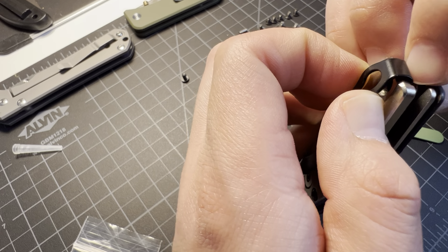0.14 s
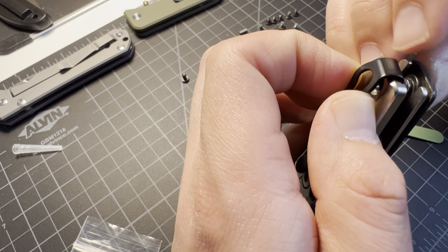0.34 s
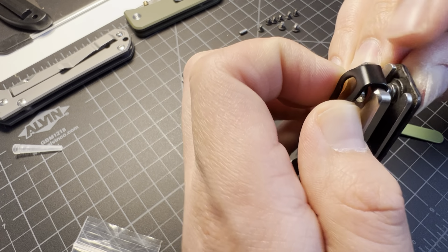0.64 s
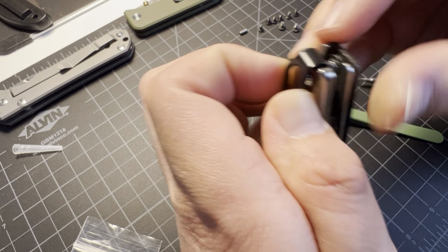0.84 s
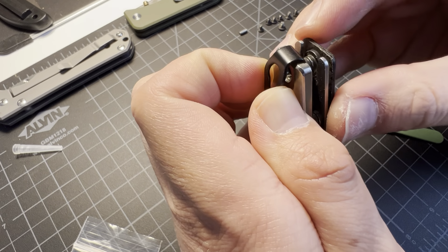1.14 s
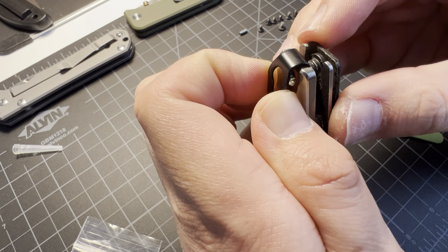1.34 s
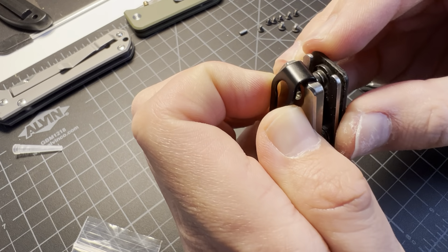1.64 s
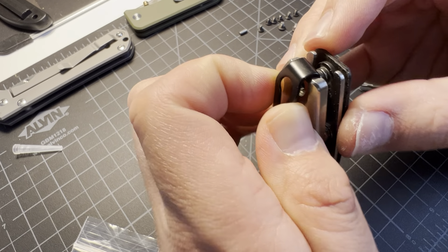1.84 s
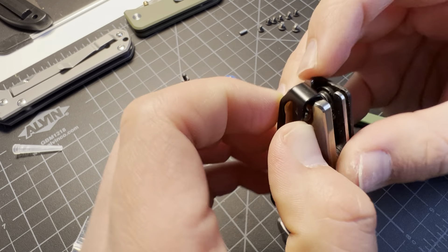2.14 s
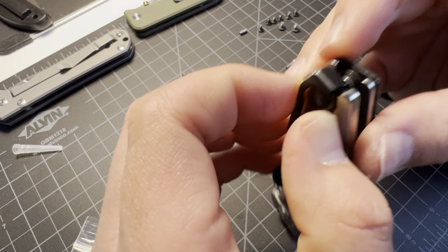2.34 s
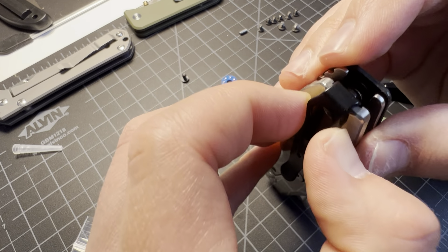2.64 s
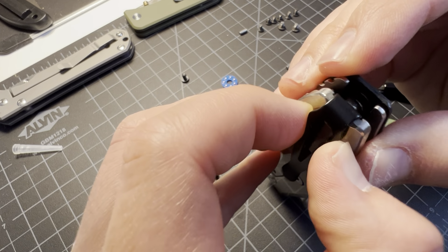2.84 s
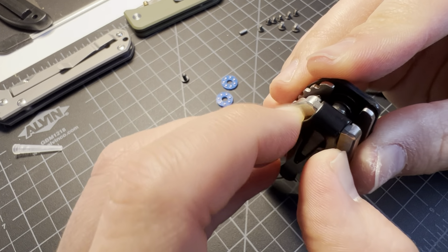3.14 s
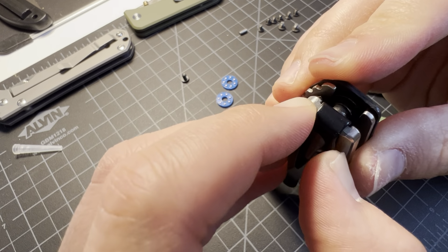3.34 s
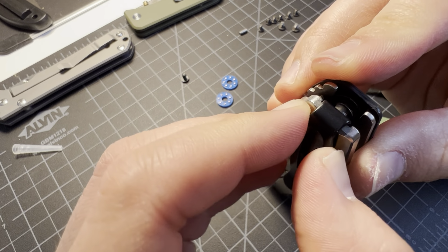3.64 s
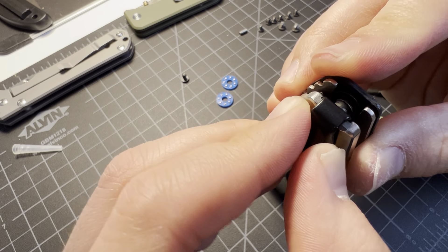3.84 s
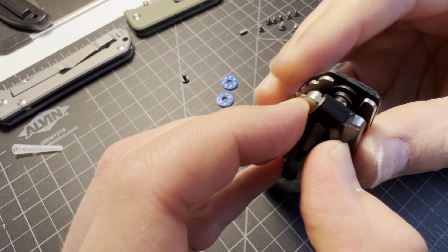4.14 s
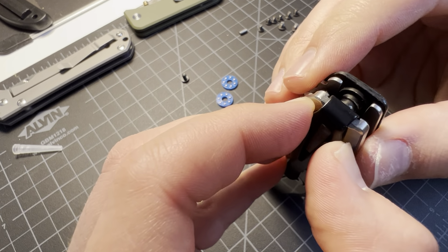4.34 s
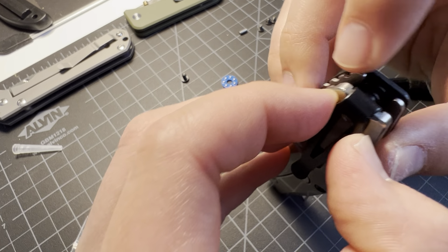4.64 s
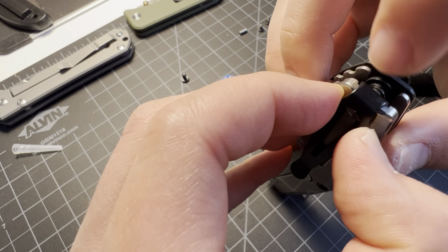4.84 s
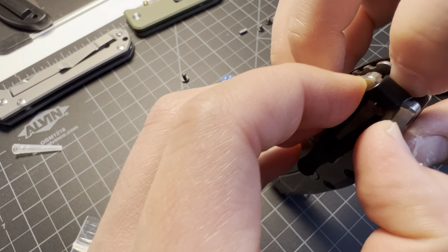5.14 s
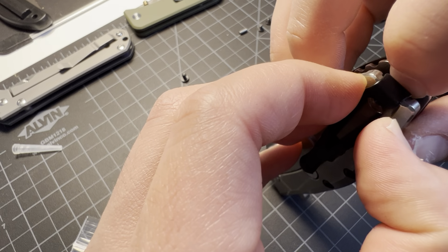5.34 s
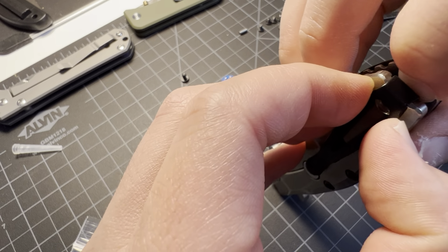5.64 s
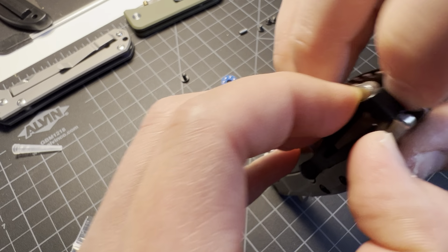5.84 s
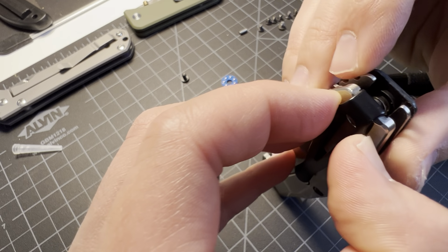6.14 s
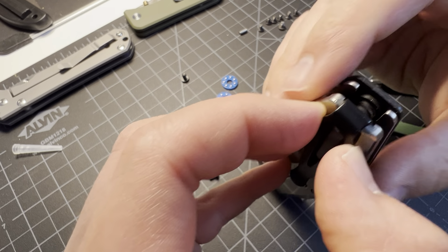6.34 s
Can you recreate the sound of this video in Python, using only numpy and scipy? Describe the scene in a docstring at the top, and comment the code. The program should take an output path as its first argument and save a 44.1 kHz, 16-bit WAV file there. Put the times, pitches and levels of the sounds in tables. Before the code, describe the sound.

Close, quiet handling of a loose folding knife over a matted bench in a small room. Soft skin rubs and tiny steel ticks come first, then a low juddering scrape along the mat ending in a firm knock with a slight rattle. Sparse clicks and thin metal slides follow, with a sharper bright snap near the end. Faint low rumble and hiss sit beneath, in close stereo.

```python
"""A half-assembled folding knife is worked between the fingers over a cutting mat in a small room.
Steel parts rub, tick and ring: bursts and grains of noise through spectra and decaying modes.
The handle is dragged over the mat by stick-slip and set down once with a knock: a falling chirp
plus bench modes. Skin swishes and squeaks faintly. Band-wise echoes, low rumble and hiss are added."""
import sys
import numpy as np
from scipy import signal
from scipy.fft import rfft, irfft, next_fast_len
from scipy.io import wavfile
from scipy.ndimage import uniform_filter1d

SR = 44100
rng = np.random.default_rng(int(sys.argv[2]) if len(sys.argv) > 2 else 0)


def log_audio(samples):
    """Write samples as a 16-bit WAV file to the path given in sys.argv[1]."""
    # one column per channel
    frames = np.atleast_2d(samples).T
    # limit to full scale, then quantise
    limited = np.clip(frames, -1, 1)
    pcm = np.round(limited * 32767).astype(np.int16)
    wavfile.write(sys.argv[1], SR, pcm)


N = 286650
TIME = np.arange(N) / SR

# Levels are relative: trims, shaping and ringing follow in the functions.
# room rumble spectrum: [hz, density_db_per_hz]
RUMBLE_COLOUR = [(15, -38), (25, -28.5), (62, 3.5), (108, -2.5), (135, -2), (204, -22), (274, -18.5),
                 (305, -27), (408, -30), (518, -47.5), (600, -58.5), (780, -71), (1320, -120)]
# rumble level over time: [time_s, level_db]
RUMBLE_LEVEL = [(0.0, -65), (0.89, -58), (1.539, -60.5), (2.132, -53), (3.26, -62), (4.34, -59),
                (4.829, -64.5), (5.559, -67), (5.96, -60.5), (6.5, -60.5)]
# hiss spectrum: [hz, density_db_per_hz]
HISS_COLOUR = [(350, -31), (600, -4), (790, -4.5), (931, -9.5), (1010, -4.5), (1130, -8), (1550, -5.5),
               (3830, -9), (4160, -13), (6460, -11), (10500, -15.5), (12000, -25.5), (16000, -24.5)]
# skin rubbing on handle and mat: [start_s, end_s, swish_db, bench_pressure_db]
RUBS = [(0.64, 0.868, -71, -63.5), (0.879, 0.95, -82, -66), (0.976, 1.06, -84.5, -85),
        (1.2, 1.244, -85.5, -70), (1.48, 1.607, -92, -79.5), (1.888, 2.043, -86.5, -70.5),
        (1.983, 2.086, -73.5, -55.5), (4.393, 4.475, -100, -67), (4.671, 4.885, -85.5, -78.5),
        (5.088, 5.415, -82, -84), (6.065, 6.266, -83.5, -66), (6.275, 6.383, -84.5, -63),
        (6.373, 6.546, -81, -63.5)]
# skin swishing over the handle: [hz, density_db_per_hz]
SKIN_COLOUR = [(300, -18), (620, -2.5), (980, -10.5), (1250, -4), (1700, -6), (2200, -7), (3000, -21),
               (4500, -20)]
# finger pressure heard through the bench: [hz, density_db_per_hz]
PRESS_COLOUR = [(100, -4), (200, -4.5), (330, -5), (420, -11), (520, -32), (900, -23), (2000, -48)]
# metal parts sliding on each other: [start_s, end_s, level_db, focus_hz, focus_db, crest_place_0_to_1]
SLIDES = [(0.83, 0.904, -71.5, 9800, 15.5, 0.14), (0.884, 0.945, -75.5, 6600, -2, 0.1),
          (1.097, 1.132, -80.5, 6500, 3, 0.1), (1.87, 2.09, -75.5, 3480, 13, 0.23),
          (1.887, 2.073, -80, 7300, 0, 0.8), (2.322, 2.37, -79, 5640, 5, 0),
          (2.484, 2.507, -75.5, 5000, 14, 0.35), (2.991, 3.068, -81.5, 5250, 12, 0.2),
          (3.202, 3.274, -78, 6560, -2, 0.1), (4.005, 4.068, -78, 6730, 14, 0.58),
          (4.54, 4.595, -87, 7000, 10.5, 0.04), (4.11, 4.136, -71, 10200, 20, 0.6),
          (4.145, 4.209, -74, 10400, 11, 0.25), (4.726, 4.79, -80.5, 5010, 4, 0.64),
          (4.985, 5.05, -81, 7800, 0, 0.25), (5.192, 5.335, -73.5, 9220, 9.5, 0.15),
          (5.888, 5.945, -71.5, 7300, 7, 0.13), (5.937, 5.964, -70, 7440, 8, 0.7),
          (6.284, 6.376, -68, 8920, 12.5, 0.24), (6.301, 6.375, -73.5, 5300, 19.5, 0.45),
          (6.381, 6.496, -80, 5330, 14, 0.44), (6.402, 6.56, -78, 10000, 5, 0.5),
          (6.468, 6.54, -74, 5560, 15, 0.2)]
# steel sliding on steel: [hz, density_db_per_hz]
SLIDE_COLOUR = [(1500, -9.5), (2600, -1), (3600, -7.5), (4400, -1.5), (5300, 0), (6100, 0.5), (7200, 4),
                (8500, -2.5), (9700, -3), (10800, -6), (12000, -17.5), (15500, -17.5)]
# modes of steel liners and scales: [hz, level_db, t60_s]
KNIFE_MODES = [(3490, -4, .15), (4800, -3.5, 0.18), (5620, -4, 0.13), (5800, -2.5, 0.0983),
               (6900, -9, 0.089), (7810, 4, 0.11), (7780, 2, 0.11), (8184, -2.5, .14), (10100, -3, .11),
               (9800, -5, .11)]
# handle bumping the bench: [start_s, peak_db, deep_weight_db, softness_hz]
BUMPS = [(0.888, -52.5, -7, 380), (2.042, -33, -16, 590), (2.077, -30.5, -6, 406), (2.1066, -19, -15, 430),
         (2.1615, -22, -11, 415), (2.182, -32.5, 2, 400), (2.248, -28, -2, 396), (2.311, -39, 16, 655),
         (2.5124, -12.5, 0, 2440), (2.5274, -26, 15, 500), (3.325, -64.5, -4, 643), (3.886, -59.5, 2, 606),
         (4.114, -50, -1, 416), (4.155, -46.5, 0, 434), (4.394, -44, -2.5, 380), (4.987, -49, -0.5, 474),
         (5.899, -48, -28, 790), (6.074, -53, 1, 560)]
# height of a bending wave as each pitch arrives: [hz, height_db]
BENDING_WAVE = [(50, -72.5), (72, -17.5), (98, -3), (130, -2), (190, -5.5), (330, 1), (480, 4), (720, -6),
                (1200, -22), (3000, -26.5)]
# modes of the bench top under the mat: [hz, level_db, t60_s]
BENCH_MODES = [(86.4, -6, 0.054), (128.24, 3.5, 0.17), (225.4, -9.5, 0.49), (291, 0, 0.24),
               (325.7, -1.5, 0.22), (357, -3, 0.23), (395.2, 1.5, 0.2), (411.1, -5, 0.2), (507, -11, 0.21),
               (606, -24.5, 0.11), (683.5, -13, 0.2), (815, -25.5, 0.21), (1090, -26.5, 0.22)]
# parts clicking together: [start_s, tick_db, focus_hz, focus_db, handle_jolt_db]
CLICKS = [(1.102, -66, 6500, -2, -73), (1.929, -59, 3000, 19, -82), (2.023, -62, 3000, 15, -52),
          (2.3323, -59, 5830, 8, -63), (2.36, -63, 5270, 15, -75), (2.388, -70, 5100, 13, -76),
          (2.6278, -64, 6850, 10, -69), (2.6544, -64, 6900, 5, -67.5), (2.919, -78, 4030, 3.5, -61),
          (3.2022, -65, 6830, 3, -46.5), (3.2127, -55.5, 6760, 9, -61), (3.234, -46, 6300, 9, -51),
          (3.68, -70.5, 7000, 5.5, -64.5), (3.9215, -59.5, 4350, 28, -59.5), (4.03, -71, 6850, 11.5, -64),
          (4.115, -60, 6880, 17, -83), (4.154, -51.5, 6630, 4, -64), (4.5464, -45, 7060, 12.5, -46.5),
          (4.6737, -65.5, 3025, 17, -58), (4.949, -71.5, 3070, 9, -65), (5.1173, -61.5, 3020, 8.5, -63.5),
          (5.2124, -57, 4960, 12, -62), (5.2804, -63.5, 9200, 4.5, -53.5), (5.877, -51, 8500, 15, -68),
          (5.89, -62, 7000, 11, -66.5), (5.9, -49, 5550, 20, -58.5), (5.9068, -51.5, 5550, 8, -58.5),
          (5.9123, -42, 8000, 10, -52.5), (5.9596, -30.5, 8600, 10.5, -44), (5.989, -51, 8250, 10, -52),
          (6.0737, -67, 5110, -6, -68), (6.217, -65, 3450, 9, -60)]
# tick of a steel edge: [hz, density_db_per_hz]
CLICK_COLOUR = [(1500, -32), (2100, 3), (3000, -3), (3600, 8), (4250, 1), (4800, 8.5), (5600, 7.5),
                (6600, 4), (7800, 7), (8700, 2.5), (10100, 9), (11300, -7), (12200, -2), (13500, -13),
                (15500, -4.5)]
# clack of the composite scale: [hz, density_db_per_hz]
CLACK_COLOUR = [(400, -7), (800, -1.5), (1300, -2), (2100, 2.5), (3000, -11.5), (5000, -18)]
# pushes of the handle over the mat: [start_s, length_s, judder_db, scuff_db, grit_db]
PUSHES = [(2.044, 0.16, -34.5, -46, -57), (2.208, 0.052, -37, -52.5, -62), (2.302, 0.049, -48.5, -65, -87)]
# judder of the dragged handle: [hz, density_db_per_hz]
JUDDER_COLOUR = [(47, -43), (80, -2), (129, 6), (160, -4), (217, 7.5), (300, 4), (400, -1), (460, -5.5),
                 (540, -21.5), (700, -29.5)]
# scuffing body of the handle: [hz, density_db_per_hz]
SCUFF_COLOUR = [(520, -8.5), (670, 8), (800, 2), (900, -6), (1030, 0), (1440, -16), (1650, -14), (2100, -8),
                (2280, -22.5), (2550, -21.5), (2900, -30)]
# grit under the handle: [hz, density_db_per_hz]
GRIT_COLOUR = [(1470, -44), (2500, -10), (3200, -6.5), (4620, -2), (5800, -0.5), (6700, 9), (7600, -0.5),
               (9150, 1.5), (10900, 0.5), (12200, -23), (14700, -16), (16000, -18)]
# loose stack jarred as it catches, is set down and settles: [start_s, steel_db, handle_db, decay_s]
RATTLE = [(2.132, -66, -42, 0.0056), (2.14, -68, -42, 0.0052), (2.222, -74, -51.5, 0.0031),
          (2.5117, -45, -29, 0.005), (2.519, -58, -48.5, 0.022), (2.527, -52.5, -47, 0.0027),
          (2.548, -78, -60.5, 0.033), (2.664, -92, -70, 0.012)]
# hollow clatter of the handle: [hz, density_db_per_hz]
CLATTER_COLOUR = [(520, -8), (660, 7), (830, 4), (1050, -4), (1400, -12), (2050, -4), (2450, -13.5),
                  (2920, -20), (3300, -18.5), (5000, -28.5)]
# modes of the hollow handle: [hz, level_db, t60_s]
HANDLE_MODES = [(1835, -13, .09), (2048, -12, 0.1), (2844, -4, .07), (2977, 0, .08)]
# small steel part tapping its seat: [start_s, level_db]
PIN_TAPS = [(3.68, -50.5), (3.6941, -45), (3.744, -68)]
# click of the small steel part: [hz, density_db_per_hz]
PIN_COLOUR = [(700, -28), (1300, -11), (2600, -30), (3050, -10.5), (3400, -1), (4500, -6), (5200, -10.5),
              (5750, 5), (6330, -7), (6900, 9), (7700, -8), (8400, -12), (9700, -22), (12000, -31)]
# modes of the small steel part: [hz, level_db, t60_s]
PIN_MODES = [(4140, -11, 0.08), (5880, 0, 0.09), (6855, 4, 0.074), (7150, -13, 0.06)]
# fingertips squeaking on the scale: [start_s, end_s, level_db, first_hz, last_hz]
SQUEAKS = [(4.398, 4.461, -53.5, 331, 247.6), (6.292, 6.365, -79, 970, 910), (6.404, 6.5, -67.5, 550, 515)]
# room by band: [centre_hz, echo_db, t60_s, left_right_likeness]
ROOM = [(106, -23.5, 0.36, 0.94), (199.2, -12.5, 0.14, 1), (340, -8.5, 0.35, 0.32), (701, -2, 0.27, -0.431),
        (1230, -5.5, 0.26, -0.49), (2284, -6, 0.23, 0.97), (4630, -9, 0.21, .1), (9020, -11.5, 0.19, 0.39)]
# right channel tone, fuller near 1.2-1.7 kHz, slightly thinner near 2.3 kHz: [hz, gain_db]
RIGHT_COLOUR = [(1, 0), (600, 0), (1200, 3), (1700, 2.5), (2300, -1.5), (4000, 0), (22000, 0)]

UNSTEADY_PER_S = 83   # rate of finger-pressure changes
LIGHT_RUB_HZ, LIGHT_PRESS_DB, PRESS_DB_PER_OCTAVE = 1620, -73, 7.5
JUDDER_POWER, SCUFF_POWER, GRIT_POWER = 0.31, 0.96, 0.94   # growth with sliding speed
CUTOFF_HZ = 15900


def from_db(db):
    """Decibels to gain."""
    return 10 ** (np.asarray(db) / 20)


def rms_one(x):
    """Scale to unit rms."""
    return x / np.sqrt(np.mean(x ** 2) + 1e-20)


def add(track, start_s, sound):
    """Mix a sound into a track at a time."""
    at = int(round(start_s * SR))
    track[at:at + len(sound)] += sound[:max(N - at, 0)]


def waver(size, per_s):
    """Smooth random wandering within +-2."""
    points = np.clip(rng.standard_normal(400), -2, 2)
    return np.interp(np.arange(size) * per_s / SR, np.arange(400), points)


def coloured(x, points, focus_hz=None, focus_db=0, focus_octaves=0.53, ripple_db=0, spacing_hz=170):
    """Minimum-phase filter: a spectrum, a hump at focus_hz and close-set random resonances."""
    size = 2 * next_fast_len(len(x) // 2 + 2048)
    bins_hz = np.maximum(np.fft.rfftfreq(size, 1 / SR), 1)
    octave = np.log2(bins_hz)
    hz, db = np.transpose(points)
    below = np.maximum(np.log2(hz[0]) - octave, 0)
    above = np.maximum(octave - np.log2(hz[-1]), 0)
    curve_db = np.interp(octave, np.log2(hz), db) - 24 * (below + above)   # 24 dB/octave outside
    if focus_hz:
        distance = (octave - np.log2(focus_hz)) / focus_octaves
        curve_db = curve_db + focus_db * np.exp(-distance ** 2)
    resonances = np.clip(rng.standard_normal(400), -2, 2)
    curve_db = curve_db + ripple_db * np.interp(bins_hz / spacing_hz, np.arange(400), resonances)
    # fold the cepstrum so that nothing sounds early
    cepstrum = irfft(np.log(from_db(curve_db)))
    cepstrum[1:size // 2] *= 2
    cepstrum[size // 2 + 1:] = 0
    response = np.exp(rfft(cepstrum))
    return irfft(rfft(x, size) * response)[:len(x)]


def grains(size, per_s, spread_db):
    """Random tiny contacts of uneven strength and either sign."""
    strength = from_db(spread_db * np.minimum(rng.exponential(1, size), 4))
    return (rng.random(size) < per_s / SR) * strength * rng.choice([-1, 1], size)


def stroke(start_s, end_s, per_s, spread_db, crest, uneven_db):
    """Friction grains of one finger movement: rise to a crest, ease off, unsteady pressure."""
    size = int((end_s - start_s) * SR)
    arc = np.interp(np.linspace(0, 1, size), [0, np.clip(crest, .05, .95), 1], [0, 1, 0])
    pressure = from_db(uneven_db * waver(size, UNSTEADY_PER_S))
    return arc * pressure * grains(size, per_s, spread_db)


def chatter(decay_s, colour, focus_hz=None, focus_db=0, seat_s=0.0029):
    """Hard contact: micro-impacts build as the faces seat and die in milliseconds."""
    t = TIME[:SR // 12]
    shape = np.exp(-(t / decay_s) ** 2.2) * (1 - np.exp(-t / seat_s))
    noise = rng.standard_normal(len(t)) * shape
    burst = coloured(noise, colour, focus_hz, focus_db, ripple_db=2.5, spacing_hz=140)
    return rms_one(burst) * np.sqrt(np.mean(shape ** 2))


def ringing(force, modes, ring_db):
    """The contact itself plus hand-damped resonators of the struck part."""
    out = force.copy()
    for hz, db, t60_s in modes:
        r, w = from_db(-60 / (t60_s * SR)), 2 * np.pi * hz / SR
        top, bottom = [1, -r * np.cos(w)], [1, -2 * r * np.cos(w), r * r]
        out += from_db(db + ring_db) * signal.lfilter(top, bottom, force + 1e-18)
    return out


def evened(x):
    """Level held steady over 1300 samples (about 29 ms), finer grain kept."""
    return x / np.sqrt(np.abs(uniform_filter1d(x ** 2, size=1300)) + 1e-9)


def air(spectrum, side_db):
    """Steady stereo noise from independent mid and side, set by colour and width."""
    mid, side = [rms_one(coloured(rng.standard_normal(N + SR), spectrum)[SR:]) for _ in range(2)]
    return mid + from_db(side_db) * side * np.array([[1], [-1]])


def background(rumble_trim_db=3, waver_db=1.93, hiss_db=-85):
    """Slowly swelling, wavering low room rumble and a faint steady hiss."""
    time_s, level_db = np.transpose(RUMBLE_LEVEL)
    swell_db = rumble_trim_db + np.interp(TIME, time_s, level_db) + waver_db * waver(N, 16)
    rumble = from_db(swell_db) * air(RUMBLE_COLOUR, side_db=-14.5)
    return rumble + from_db(hiss_db) * air(HISS_COLOUR, side_db=0)


def rubs(press_trim_db=-2):
    """Skin ridges swish, lower when pressed flatter; pressure murmurs through the bench."""
    out = np.zeros(N)
    for start_s, end_s, swish_db, bench_db in RUBS:
        focus_hz = LIGHT_RUB_HZ * 2 ** ((LIGHT_PRESS_DB - bench_db) / PRESS_DB_PER_OCTAVE)
        ridges = stroke(start_s, end_s, per_s=1600, spread_db=1.5, crest=0.2, uneven_db=-0.5)
        swish = coloured(ridges, SKIN_COLOUR, focus_hz, focus_db=10.0, focus_octaves=0.91,
                         ripple_db=4.5, spacing_hz=68.8)
        murmur = coloured(ridges, PRESS_COLOUR)
        add(out, start_s, from_db(swish_db) * rms_one(swish))
        add(out, start_s, from_db(bench_db + press_trim_db) * rms_one(murmur))
    return out


def slides():
    """Fine machining marks catch one another and excite the liners."""
    out = np.zeros(N)
    for start_s, end_s, db, focus_hz, focus_db, crest in SLIDES:
        marks = stroke(start_s, end_s, per_s=6500, spread_db=2.5, crest=crest, uneven_db=2.9)
        rasp = coloured(marks, SLIDE_COLOUR, focus_hz, focus_db, focus_octaves=0.24,
                        ripple_db=2, spacing_hz=90)
        add(out, start_s, from_db(db) * rms_one(rasp))
    return ringing(out, KNIFE_MODES, ring_db=-70)


def thud(peak_db, weight_db, soft_hz, lag_cycles=1.318, top_hz=3000, deep_hz=200, ring_db=-16):
    """A bending wave crosses the bench, highs first and lows last; its modes ring on."""
    t = TIME[:SR // 5]
    arriving_hz = lag_cycles / (t + lag_cycles / top_hz)
    wave_hz, wave_db = np.transpose(BENDING_WAVE)
    height_db = np.interp(np.log(arriving_hz), np.log(wave_hz), wave_db)
    height_db = height_db + weight_db / (1 + (arriving_hz / deep_hz) ** 4)
    blow = from_db(height_db) * np.sin(2 * np.pi * np.cumsum(arriving_hz) / SR)
    for hz, mode_db, t60_s in BENCH_MODES:
        age_s = np.maximum(t - lag_cycles / hz, 0)
        gain = from_db(ring_db + mode_db + weight_db / (1 + (hz / deep_hz) ** 4))
        envelope = (1 - np.exp(-age_s * hz)) * from_db(-60 * age_s / t60_s)
        blow = blow + gain * np.sin(2 * np.pi * hz * age_s) * envelope
    blow = signal.sosfilt(signal.butter(6, soft_hz, fs=SR, output="sos"), blow)   # contact softness
    blow = signal.sosfilt(signal.butter(2, 50, "high", fs=SR, output="sos"), blow)
    return from_db(peak_db) * blow / np.abs(blow).max()


def bumps():
    """The handle meets the bench through the mat."""
    out = np.zeros(N)
    for start_s, peak_db, weight_db, soft_hz in BUMPS:
        add(out, start_s, thud(peak_db, weight_db, soft_hz))
    return out


def buzz(focus_hz, focus_db, decay_s=0.0056, per_s=1200):
    """After a tick the loose liners tremble against each other in ever smaller contacts."""
    t = TIME[:SR // 8]
    contacts = coloured(grains(len(t), per_s, spread_db=3), CLICK_COLOUR, focus_hz, focus_db / 2)
    return rms_one(contacts) * np.exp(-t / decay_s)


def clicks(tick_trim_db=2, buzz_trim_db=-23, clack_trim_db=-2, thud_trim_db=0.5):
    """Steel edges tick and buzz; the jolt makes the composite scale clack and the bench thud."""
    out, bench = np.zeros(N), np.zeros(N)
    for start_s, db, focus_hz, focus_db, jolt_db in CLICKS:
        tick = chatter(0.0029, CLICK_COLOUR, focus_hz, focus_db)
        clack = chatter(0.0027, CLACK_COLOUR)
        add(out, start_s, from_db(db + tick_trim_db) * tick)
        add(out, start_s, from_db(db + buzz_trim_db) * buzz(focus_hz, focus_db))
        add(out, start_s, from_db(jolt_db + clack_trim_db) * clack)
        add(bench, start_s, thud(jolt_db + thud_trim_db, weight_db=-6, soft_hz=433))
    return ringing(out, KNIFE_MODES, ring_db=-56) + bench


def drag(slips_per_s=420, spit_depth=0.84, spit_decay_s=0.00088, catch_db=6):
    """Stick-slip pushes: each slip shakes the bench, crunches in the handle and spits grit."""
    out, bench, t = np.zeros(N), np.zeros(N), TIME[:SR // 2]
    for start_s, length_s, judder_db, scuff_db, grit_db in PUSHES:
        speed = np.sin(np.pi * np.minimum(t / length_s, 1)).clip(0)
        slips = np.zeros(len(t))
        slip_s = np.cumsum(rng.gamma(4, 1 / (4 * slips_per_s), 600))
        slip_index = np.minimum(slip_s * SR, len(t) - 1).astype(int)
        slips[slip_index] = from_db(rng.normal(0, 2.5, len(slip_s)))
        catches = slips * from_db(catch_db * waver(len(t), 300))
        judder = evened(coloured(slips - slips.mean(), JUDDER_COLOUR))
        scuff = evened(coloured(catches * rng.choice([-1, 1], len(t)), SCUFF_COLOUR))
        spits = signal.lfilter([1], [1, -np.exp(-1 / (spit_decay_s * SR))], catches + 1e-18)
        grit_noise = rng.standard_normal(len(t)) * (1 + spit_depth * spits)
        grit = evened(coloured(grit_noise, GRIT_COLOUR))
        add(bench, start_s, from_db(judder_db) * judder * speed ** JUDDER_POWER)
        add(out, start_s, from_db(scuff_db) * scuff * speed ** SCUFF_POWER)
        add(out, start_s, from_db(grit_db) * grit * speed ** GRIT_POWER)
    return out + ringing(bench, BENCH_MODES, ring_db=-62.5)


def rattle():
    """Each jar shakes the unscrewed stack: steel jingles over the hollow clatter of the handle."""
    steel, hollow = np.zeros(N), np.zeros(N)
    for start_s, steel_db, handle_db, decay_s in RATTLE:
        jingle = chatter(decay_s, SLIDE_COLOUR, 4100, focus_db=7.0, seat_s=0.00098)
        clatter = chatter(decay_s, CLATTER_COLOUR, seat_s=0.0002)
        add(steel, start_s, from_db(steel_db) * jingle)
        add(hollow, start_s, from_db(handle_db) * clatter)
    return ringing(steel, KNIFE_MODES, ring_db=-55.5) + ringing(hollow, HANDLE_MODES, ring_db=-50)


def pin_taps(decay_s=0.0024, rustle_db=-22, rustle_s=0.012):
    """A small steel part clicks against its seat and shivers there with a fine rustle."""
    out, t = np.zeros(N), TIME[:SR // 12]
    for start_s, db in PIN_TAPS:
        shivers = coloured(grains(len(t), 2500, spread_db=2), PIN_COLOUR)
        rustle = rms_one(shivers) * np.exp(-t / rustle_s)
        tap = chatter(decay_s, PIN_COLOUR, seat_s=0.00021)
        add(out, start_s, from_db(db) * (tap + from_db(rustle_db) * rustle))
    return ringing(out, PIN_MODES, ring_db=-62)


def squeaks(jitter=0.076, overtone_db=-34):
    """Fingertip stick-slip fast enough for a rough tone, which sags as the finger slows."""
    out = np.zeros(N)
    for start_s, end_s, db, first_hz, last_hz in SQUEAKS:
        size = int((end_s - start_s) * SR)
        along = np.linspace(0, 1, size)
        pitch_hz = (first_hz + (last_hz - first_hz) * along) * (1 + jitter * waver(size, 590))
        phase = 2 * np.pi * np.cumsum(pitch_hz) / SR
        tone = np.sin(phase) + from_db(overtone_db) * (np.sin(2 * phase) + np.sin(3 * phase))
        level = from_db(db + 2 * waver(size, UNSTEADY_PER_S))
        add(out, start_s, level * np.sin(np.pi * np.sqrt(along)) * tone)
    return out


def room(x, gap_s=0.00017):
    """Diffuse stereo echoes of a small room, dying band by band."""
    t = TIME[:SR // 2]
    centres_hz = np.array(ROOM)[:, 0]
    edges_hz = np.r_[centres_hz[0] / 2, np.sqrt(centres_hz[1:] * centres_hz[:-1]), CUTOFF_HZ]
    echo = 0
    for (_, db, t60_s, alike), low_hz, high_hz in zip(ROOM, edges_hz, edges_hz[1:]):
        band = signal.butter(6, [low_hz, high_hz], "band", fs=SR, output="sos")
        envelope = from_db(-60 * t / t60_s) * np.clip(t / gap_s - 1, 0, 1)
        tail = signal.sosfilt(band, rng.standard_normal((2, len(t))) * envelope)
        mid, side = [rms_one(v) * np.sqrt((high_hz - low_hz) / SR / len(t)) for v in tail]
        spread = np.sqrt(1 - alike) * side * np.array([[1], [-1]])
        echo = echo + from_db(db) * (np.sqrt(1 + alike) * mid + spread)
    return signal.fftconvolve(x[None], echo, axes=1)[:, :N]


def scene(bounce_db=-11):
    """Left lags a sample, right has its own tone colour; each has its own bench-top bounce."""
    work = rubs() + slides() + bumps() + clicks() + drag() + rattle() + pin_taps() + squeaks()
    bounce_filter = signal.butter(2, 2600, "high", fs=SR, output="sos")
    bounce = from_db(bounce_db) * signal.sosfilt(bounce_filter, work)
    left, right = work + room(work)
    left = np.r_[0, left[:-1]] + np.interp(TIME - .00068, TIME, bounce)
    right = coloured(right, RIGHT_COLOUR) + np.interp(TIME - .00095, TIME, bounce)
    return np.array([left, right]) + background()


def record(dry):
    """Steep elliptic low-pass at CUTOFF_HZ."""
    return signal.sosfilt(signal.ellip(10, .2, 80, CUTOFF_HZ, fs=SR, output="sos"), dry)


dry = scene()
out = record(dry)
log_audio(out)
```